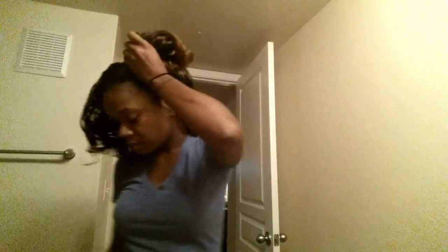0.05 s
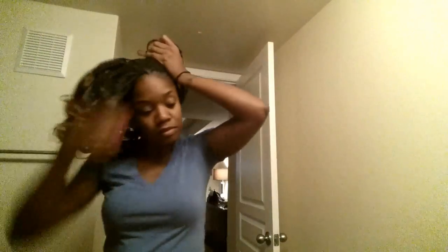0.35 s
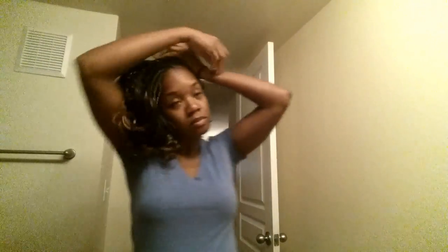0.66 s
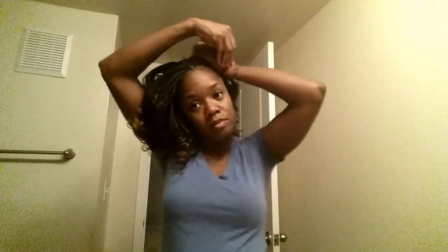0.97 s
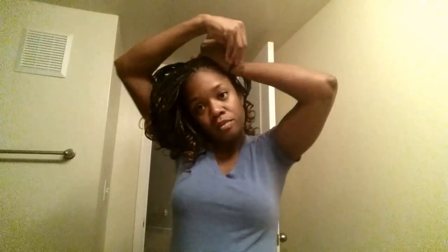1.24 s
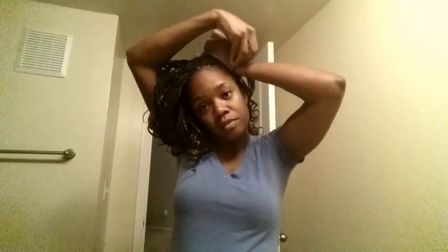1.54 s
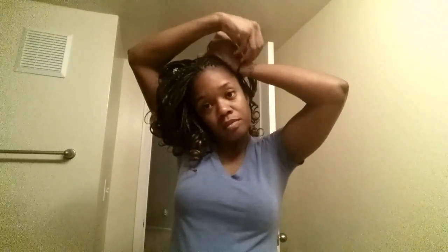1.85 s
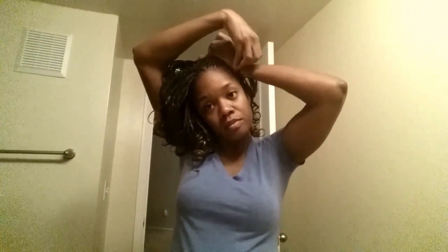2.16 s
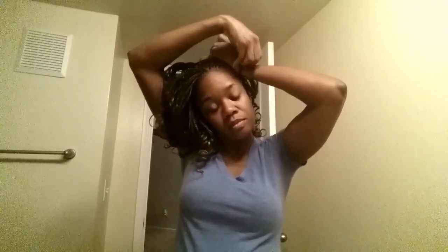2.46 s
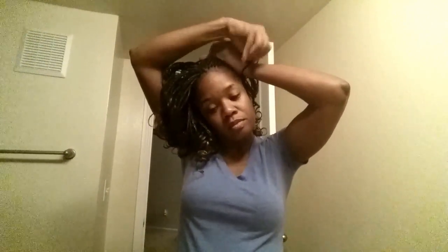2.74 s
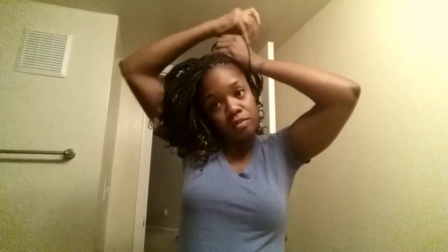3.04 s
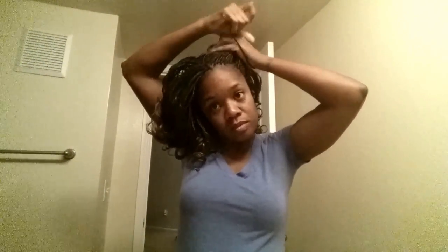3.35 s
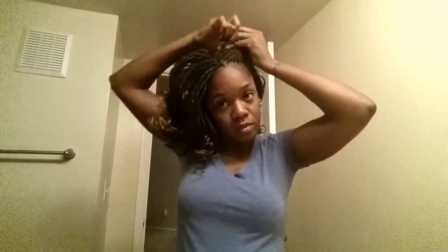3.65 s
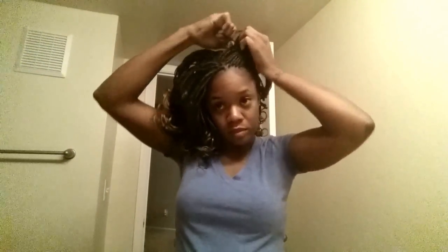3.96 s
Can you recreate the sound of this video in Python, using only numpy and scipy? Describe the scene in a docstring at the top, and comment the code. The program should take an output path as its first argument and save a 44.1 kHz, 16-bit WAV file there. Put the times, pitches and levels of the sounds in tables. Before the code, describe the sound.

Soft hair rustling near the microphone in a small bathroom, over the constant low hum and rumble of a fan. Tossed braids swish once, fingers slide along them, and an elastic tie gives a few light snaps.

```python
"""Tying up braids in a small bathroom

Hands gather synthetic braids and stretch a hair tie around them. A swish of tossed braids
dies away; then the fibres slide with a thin hiss and the tie slips and snaps softly.
A ventilation fan hums and rumbles throughout, and the hard walls answer briefly."""
import sys
import numpy as np
from scipy import signal
from scipy.fft import rfft, irfft, next_fast_len
from scipy.io import wavfile
from scipy.ndimage import map_coordinates

SR = 44100
rng = np.random.default_rng(int(sys.argv[2]) if len(sys.argv) > 2 else 0)


def store_wav(level_fs):
    """Save 16-bit WAV to argv[1]."""
    pcm = np.round(np.clip(np.atleast_2d(level_fs), -1, 1) * 32767)
    wavfile.write(sys.argv[1], SR, pcm.T.astype(np.int16))


N = 176400
TIME = np.arange(N) / SR


def amp(db):
    """Turn decibels into a gain."""
    return 10 ** (np.asarray(db) / 20)


def unit(x):
    """Scale a signal to an average power of 1."""
    return x / np.sqrt(np.mean(x ** 2) + 1e-20)


def along(points, hz):
    """Read between (Hz, value) points on a log scale."""
    freqs, values = np.transpose(points)
    return np.interp(np.log(hz + 1), np.log(freqs + 1), values)


def pan(db):
    """Left and right gains, with the left louder by db."""
    return amp(np.array([[.5], [-.5]]) * db)


def level(rows):
    """A gain curve through (seconds, dB) points."""
    return amp(np.interp(TIME, *np.transpose(rows)))


def white():
    """Separate noise for each ear."""
    return rng.standard_normal((2, N))


def filtered(x, response):
    """Give each frequency its own gain."""
    size = next_fast_len(N + SR // 2)
    return irfft(rfft(x, size) * response(np.fft.rfftfreq(size, 1 / SR)), size)[..., :N]


def coloured(x, spectrum):
    """Shape a sound's lows and highs, then set its power to 1."""
    return unit(filtered(x, lambda hz: amp(along(spectrum, hz))))


def wobble(turns_per_s=9):
    """A smooth random curve."""
    points = rng.standard_normal(int(N * turns_per_s / SR) + 4)
    return map_coordinates(points, [TIME * turns_per_s])


def tone(hz, unsteady):
    """A tone that wavers in level and phase."""
    sway = 1 - unsteady + unsteady * (wobble() + 1j * wobble())
    return unit(np.real(sway * np.exp(2j * np.pi * (hz * TIME + rng.random()))))


def friction(spectrum, slips_per_s=2800, spread_db=2.5, smooth_share=0.58):
    """Countless tiny fibre slips of uneven size over a smooth rub."""
    slips = rng.random(N) < slips_per_s / SR
    sizes = amp(spread_db * np.minimum(rng.exponential(size=N), 4))
    crackle = np.sqrt(1 - smooth_share) * unit(slips * sizes * white())
    return coloured(crackle + np.sqrt(smooth_share) * white(), spectrum)


def strokes(rows):
    """Each stroke swells to its peak and fades; their powers add."""
    swells = (amp(db) * np.exp(-np.abs(TIME - peak) / np.where(TIME < peak, rise, fall))
              for peak, db, rise, fall in rows)
    return np.sqrt(sum(swell ** 2 for swell in swells))


# The hiss's colour. Each row: frequency in Hz, relative level in dB.
HISS_COLOUR = [(500, -34), (950, -11), (1500, -6.5), (2000, -8.5), (3100, -15.5), (5000, -21),
               (6500, -26.5), (8000, -26.5), (10500, -24), (12500, -14), (14400, -11), (15700, -12)]
# Where the hiss sits. Each row: frequency in Hz, left minus right in dB.
HISS_PAN = [(1300, -1.5), (2400, -2), (4400, -15), (8000, -5), (15000, 3.5)]
def hiss():
    """The faint steady hiss of the microphone."""
    return amp(-72.5) * filtered(coloured(white(), HISS_COLOUR), lambda hz: pan(along(HISS_PAN, hz)))


# The rumble's colour. Each row: frequency in Hz, relative level in dB.
AIR_COLOUR = [(18, -38), (30, -6.5), (69, -8.5), (101, -8.5), (128, -7.5), (212, -13), (392, -16.5),
              (438, -20.5), (497, -23.5), (591, -23.5), (660, -28), (1300, -46), (1690, -74.5),
              (2860, -120)]
# How alike both ears hear it. Each row: frequency in Hz, likeness from 0 to 1.
AIR_ALIKE = [(60, 0.77), (200, 0.9), (380, 0.81), (700, 0.16), (1300, 0)]
# Where it sits. Each row: frequency in Hz, left minus right in dB.
AIR_PAN = [(60, -2.5), (110, 1.5), (200, -3.5), (380, 0.5), (1300, -1)]
def fan_air():
    """Air moved by the fan makes a low, wide rumble."""
    def widen(hz):
        angle = np.arccos(along(AIR_ALIKE, hz)) / 2
        return np.array([np.cos(angle), np.sin(angle)])
    mid, side = filtered(coloured(white(), AIR_COLOUR), widen)
    ears = np.array([mid + side, mid - side])
    return amp(-49) * unit(filtered(ears, lambda hz: pan(along(AIR_PAN, hz))))


# The motor's main hum. Each row: time in seconds, level in dB.
MAIN_HUM = [(0.0, -43.5), (0.03, -45.5), (0.38, -45), (0.4, -50), (1.18, -40), (1.28, -42.5), (1.99, -44.5),
            (2.47, -42), (2.52, -50), (2.61, -43.5), (3.7, -42.5), (4.0, -42.5)]
# Its weaker tones. Each row: pitch in Hz, level in dB, left minus right in dB, unsteadiness from 0 to 1.
MOTOR_TONES = [(27, -50.5, -0.5, 0.18), (88.74, -55, -1.5, 0.5), (163.4, -52.5, 0.5, 0.69),
               (180.2, -58, -2.5, 0.89), (238.3, -62, 1.5, .7), (440.8, -65.5, -3, 0.54),
               (600, -72.5, 1, .9)]
def fan_motor():
    """The fan's motor hums with several unsteady tones."""
    hum = level(MAIN_HUM) * pan(-6.5) * tone(hz=120.1, unsteady=0.054)
    return hum + sum(amp(db) * pan(pan_db) * tone(hz, unsteady)
                     for hz, db, pan_db, unsteady in MOTOR_TONES)


# The room's echo. Each row: frequency in Hz, seconds to fade by 60 dB.
ECHO_FADE = [(300, 0.55), (2000, 0.33), (8000, 0.26), (15000, 0.28)]
def walls(sound, echoes=8):
    """The walls' short answer, dying faster in the treble and changing as the hands move."""
    wet = np.zeros((2, N))
    for k in range(echoes):
        hz, age, noise = signal.stft(rng.standard_normal((2, SR // 2)), SR, nperseg=256)
        fade = amp(-60 * age / along(ECHO_FADE, hz)[:, None])
        tail = signal.istft(noise * fade, SR, nperseg=256)[1]
        # Each random echo blends into the next.
        share = np.maximum(1 - np.abs(np.linspace(0, echoes - 1, N) - k), 0)
        part = sound.sum(axis=0) * np.sqrt(share / 2)
        wet += signal.fftconvolve(part[None], tail / np.linalg.norm(tail[0]), axes=1)[:, :N]
    return amp(-2) * pan(-1.5) * wet


# How loud the brushing is. Each row: time in seconds, level in dB.
BRUSH_LEVEL = [(0, -66.5), (.2, -71), (.35, -73.5), (.52, -72), (.68, -80), (.9, -78), (1.02, -76.5),
               (1.15, -78), (1.6, -79.5), (2.3, -78.5), (2.6, -92.5), (2.8, -81), (3.1, -74.5), (3.5, -76),
               (4, -72.5)]
# Its colour. Each row: frequency in Hz, relative level in dB.
BRUSH_COLOUR = [(300, 3), (1050, 4), (1500, 1), (3000, -4), (5000, -9.5), (8000, -15), (11000, -7.5),
                (15500, -11.5)]
def brush():
    """Arms, shirt and hanging braids brush softly together."""
    return level(BRUSH_LEVEL) * coloured(white(), BRUSH_COLOUR)


# The grips. Each row: peak time in seconds, level in dB, rise and fall in seconds.
GRIPS = [(1.02, -68, 0.06, 0.13), (1.27, -72.5, .08, 0.087)]
# Their colour. Each row: frequency in Hz, relative level in dB.
GRIP_COLOUR = [(200, -8), (370, 2), (700, -5), (1060, 2), (1400, -12), (3000, -22.5), (6000, -46)]
def grips():
    """A dull rub as the hands close round the bunch."""
    return strokes(GRIPS) * coloured(white(), GRIP_COLOUR)


# The squeezes. Each row: peak time in seconds, level in dB, rise and fall in seconds.
SQUEEZES = [(3.66, -69.5, 0.063, 0.043), (3.74, -64, 0.033, 0.055), (3.81, -70.5, 0.065, 0.055),
            (3.865, -60.5, 0.015, 0.017), (3.93, -70, 0.062, .09)]
# Their colour. Each row: frequency in Hz, relative level in dB.
SQUEEZE_COLOUR = [(400, -23), (1700, 3), (3000, -5.5), (5000, -4.5), (6000, -11), (7200, -2.5), (8800, -5),
                  (9700, 4), (11000, -3), (15500, -0.5)]
def squeezes():
    """Fibres rub with a fuller rustle as the bunch is squeezed."""
    return strokes(SQUEEZES) * friction(SQUEEZE_COLOUR)


# The swish's colour. Each row: frequency in Hz, relative level in dB.
TOSS_COLOUR = [(300, -0.5), (1200, -1), (2500, -1.5), (5000, 2), (8000, 2), (10000, 3), (13000, -0.5),
               (15500, -2.5)]
def toss(fade_s=0.14):
    """Tossed braids swish at the start and quickly fall quiet."""
    return amp(-49 - 60 * TIME / fade_s) * friction(TOSS_COLOUR)


# The slides. Each row: peak time in seconds, sizzle and sheen in dB, rise and fall in seconds.
SLIDES = [(.86, -68.5, -80, .025, 0.044), (.968, -72, -68, .025, 0.022), (.997, -61, -67, .025, 0.012),
          (1.06, -70, -77.5, 0.024, .04), (1.57, -77.5, -91, 0.055, .08), (1.71, -80, -87.5, 0.048, .04),
          (1.853, -67.5, -77, 0.0099, 0.02), (2.11, -84, -84, .015, 0.021), (2.29, -80.5, -89, .04, 0.045),
          (2.76, -82, -88, .025, 0.043), (2.85, -69, -87, .02, .03), (2.883, -60.5, -72, 0.007, 0.024),
          (3.06, -74.5, -82.5, 0.042, .03), (3.135, -69.5, -78, 0.04, .04),
          (3.255, -71, -74.5, 0.051, 0.052), (3.337, -65, -73, 0.034, 0.033),
          (3.455, -67.5, -76, 0.034, 0.029), (3.54, -68.5, -79, 0.031, 0.024),
          (3.589, -63, -66, .013, 0.021)]
# A broad sizzle and a narrow, high sheen. Each row: frequency in Hz, relative level in dB.
SIZZLE_COLOUR = [(500, -31.5), (1500, -13.5), (4000, -15), (6500, -18), (8000, -14.5), (9000, -13),
                 (10000, -8), (11500, -5), (13000, -2), (14500, 1), (15600, -3)]
SHEEN_COLOUR = [(6500, -33.5), (7900, -15), (9000, -14.5), (9600, 2), (10100, -1.5), (11000, -7.5),
                (13000, -22)]
def slides():
    """Fingers slide lightly along the braids with a thin hiss."""
    sizzle = strokes((peak, db, rise, fall) for peak, db, _, rise, fall in SLIDES)
    sheen = strokes((peak, db, rise, fall) for peak, _, db, rise, fall in SLIDES)
    return sizzle * friction(SIZZLE_COLOUR) + sheen * friction(SHEEN_COLOUR)


# The snaps. Each row: start in seconds, seconds to fade by 60 dB,
# body, bite and top levels in dB, left minus right in dB.
SNAPS = [(.539, .02, -85, -80, -67, -14), (.832, .02, -76, -82, -73, -5), (0.991, .012, -82, -80, -60, -4),
         (1.002, 0.011, -80, -85, -61, 3), (1.046, 0.026, -81, -82, -63.5, -11),
         (1.537, 0.024, -64, -75, -67, -4.5), (1.709, .015, -80, -80, -65, -8),
         (1.8594, 0.042, -59.5, -59.5, -56.5, -4.5), (2.098, .02, -82, -78, -67, 2.5),
         (2.8309, 0.0096, -59.5, -76, -67, -9), (2.8954, 0.016, -59, -71, -46, -6.5),
         (2.899, 0.093, -62, -77, -62, -6), (3.4165, 0.0027, -78, -74, -61.5, -12),
         (3.444, 0.013, -72, -62, -53.5, -3), (3.6127, 0.042, -59.5, -59, -64, -13),
         (3.6149, 0.023, -63, -54, -47.5, -2), (3.87, 0.016, -70, -68, -55, -5)]
# A snap's low, middle and high colours. Each row: frequency in Hz, relative level in dB.
SNAP_BODY = [(300, -3.5), (900, -2.5), (1600, 1.5), (2400, -3.5), (3800, -9), (6000, -21.5), (12000, -41)]
SNAP_BITE = [(1000, -25.5), (2800, -7), (3700, 2.5), (4500, -5.5), (5400, -2.5), (7000, -5), (8600, -7),
             (12000, -22)]
SNAP_TOP = [(3000, -39), (6500, -22), (7800, -6.5), (8700, -16), (9600, 3.5), (11000, -3.5), (12500, 1.5),
            (15600, -8.5)]
def snaps(rise_s=0.00028):
    """The tie and single fibres snap: sudden bursts of slipping with no ring of their own."""
    out = np.zeros((2, N))
    body, bite, top = friction(SNAP_BODY), friction(SNAP_BITE), friction(SNAP_TOP)
    for start, fade_s, body_db, bite_db, top_db, pan_db in SNAPS:
        age = np.maximum(TIME - start, 0)
        burst = (1 - np.exp(-age / rise_s)) * amp(-60 * np.minimum(age / fade_s, 2))
        out += pan(pan_db) * burst * (amp(body_db) * body + amp(bite_db) * bite + amp(top_db) * top)
    return out


def scene():
    """Hair and hands in the room, over the fan."""
    braids = pan(-7.5) * (toss() + slides() + squeezes())  # to the right
    hair = braids + grips() + brush() + snaps()
    return hair + walls(hair) + fan_motor() + fan_air() + hiss()


def record(dry):
    """Cut away the highest treble, above 15880 Hz."""
    return signal.sosfiltfilt(signal.ellip(12, .05, 60, 15880, fs=SR, output="sos"), dry)


dry = scene()
out = record(dry)
store_wav(out)
```